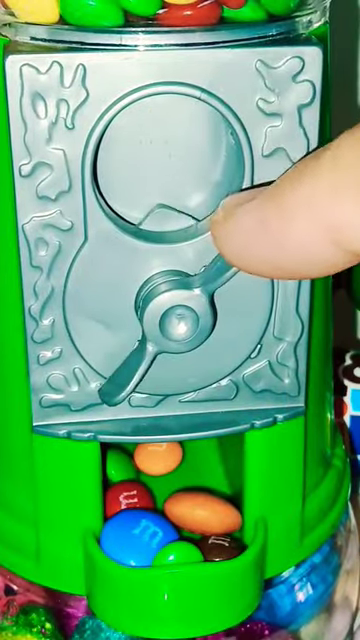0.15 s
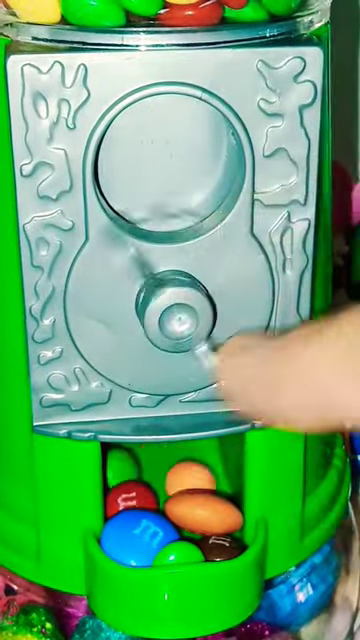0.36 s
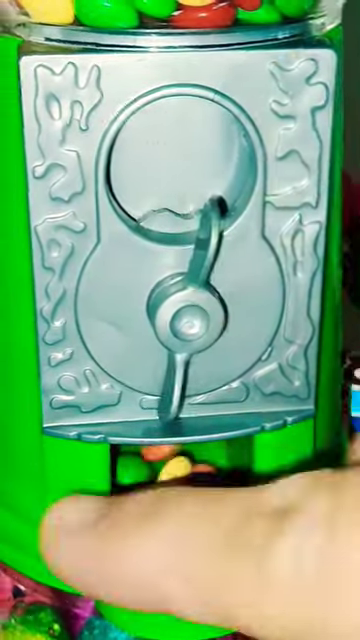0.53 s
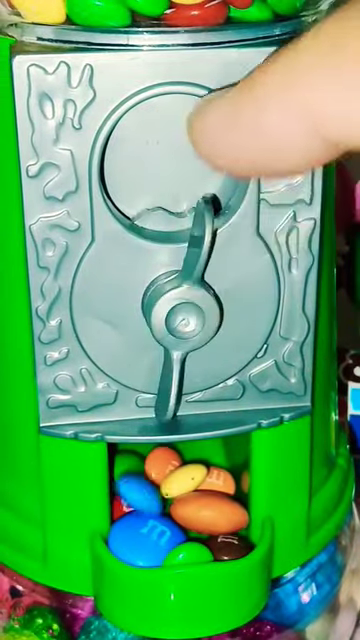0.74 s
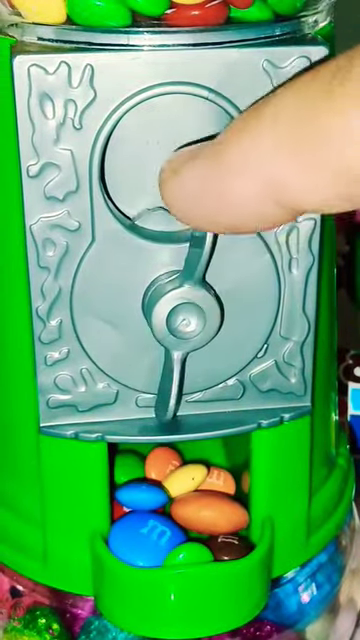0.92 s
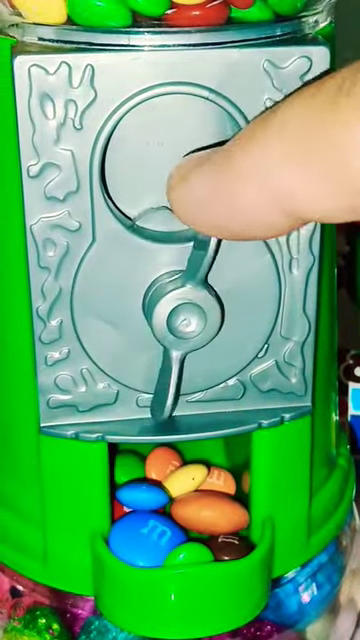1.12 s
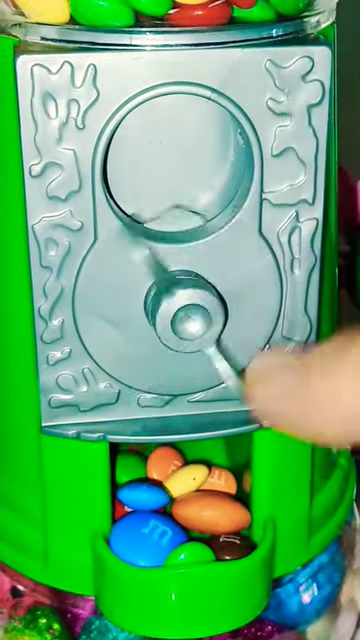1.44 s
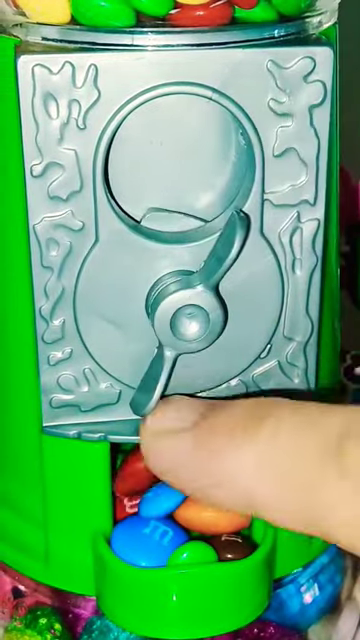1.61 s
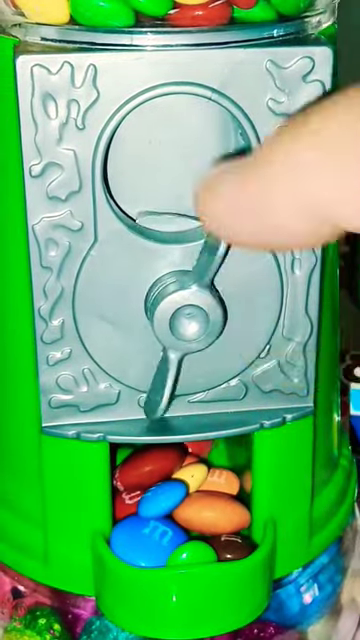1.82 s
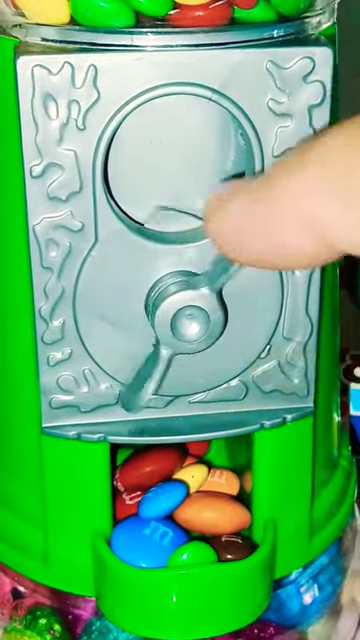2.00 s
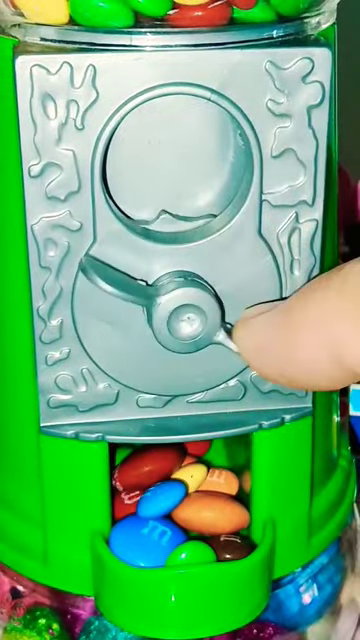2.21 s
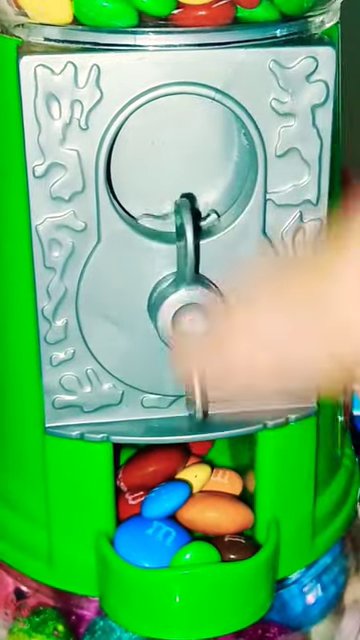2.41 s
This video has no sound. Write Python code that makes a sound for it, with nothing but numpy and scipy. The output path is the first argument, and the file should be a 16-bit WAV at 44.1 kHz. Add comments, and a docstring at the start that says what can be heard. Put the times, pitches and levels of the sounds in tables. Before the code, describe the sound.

A plastic candy dispenser's crank clicks and rubs close by from about 0.2 seconds. Hard candies bounce into the tray from 0.4 to 0.8 seconds, and the loudest knocks give low thumps. After a short lull, the axle squeaks at around 1.3 seconds and more candies drop at 1.5. The crank keeps knocking and clicking crisply until about 2.3 seconds, over a faint low hum.

```python
"""Candy dispenser, close up

A small room, the stereo microphone close to a plastic candy dispenser whose crank a finger turns.
The crank knocks and rubs, its axle squeaks and its pawl clicks; hard candies bounce down the chute
into the tray, and the plastic rings. A few loud knocks overload the microphone with a low thump;
a faint hum lies beneath."""
import sys
import numpy as np
from scipy import signal
from scipy.fft import rfft, irfft
from scipy.io import wavfile
from scipy.ndimage import uniform_filter1d, minimum_filter1d

SR = 44100
rng = np.random.default_rng(int(sys.argv[2]) if len(sys.argv) > 2 else 0)


def digitize_waveform(pressure):
    """Quantize a signal to 16-bit integers and store it at the path in sys.argv[1].

    Rows of a 2-D input are taken as channels; values are limited to [-1, 1].
    """
    field = np.atleast_2d(pressure).T
    bounded = np.clip(field, -1, 1)
    quanta = np.round(bounded * 32767).astype(np.int16)
    wavfile.write(sys.argv[1], SR, quanta)


N = 112454
TIME = np.arange(N) / SR
CONTACT_LAG_S = .0005
SHELL_LIKENESS = .76  # how alike left and right hear the hollow shell, 0 to 1
# resonances of the plastic housing: (frequency [Hz], relative level [dB])
HOUSING_MODES = [(4060, -11), (4320, 1.5), (4685, -3)]


def from_db(db):
    """Decibels to gain."""
    return 10 ** (np.asarray(db) / 20)


def unit_rms(x):
    """Scale to an rms of 1."""
    return x / np.sqrt(np.mean(x ** 2) + 1e-20)


def pan(db):
    """Channel gains for a left-minus-right level difference."""
    return unit_rms(from_db(np.array([[db], [-db]]) / 2))


def decay(t, t60):
    """Exponential fall of 60 dB in t60 seconds, starting at t = 0."""
    return np.exp(-np.log(1000) * np.maximum(t, 0) / t60)


def on_bins(points, size):
    """Spread (frequency [Hz], level [dB]) points over the bins of a transform."""
    hz, db = np.transpose(points)
    return np.interp(np.log(np.fft.rfftfreq(size, 1 / SR) + 1), np.log(hz), db)


def noise(colour, size):
    """Two unrelated channels of coloured noise, rms 1."""
    white = rng.standard_normal((2, size))
    return unit_rms(irfft(rfft(white) * from_db(on_bins(colour, size)), size))


def drift(rate_hz):
    """Smooth random wander, rms 1."""
    r = np.exp(-2 * np.pi * rate_hz / SR)
    return unit_rms(signal.lfilter([1], [1, -2 * r, r * r], rng.standard_normal(2 * N))[N:])


def high_pass(x, hz, order):
    """Take away the lows."""
    return signal.sosfilt(signal.butter(order, hz, "high", fs=SR, output="sos"), x + 1e-18)


def add(out, start_s, sound):
    """Mix a stereo sound in at a time."""
    i = int(np.clip(start_s * SR, 0, N - 1))
    out[:, i:i + sound.shape[1]] += sound[:, :N - i]


def room_air():
    """Quiet room tone, mostly low rumble, wide around the microphone."""
    # spectrum of the air: (frequency [Hz], relative level [dB])
    colour = [(25, 0.5), (420, -6.5), (800, -15), (2700, -27), (8000, -28.5), (15000, -39)]
    mid, side = noise(colour, N)
    return from_db(-54) * (mid + from_db(-6) * side * [[1], [-1]])


def hum(hz=93, wander_hz=2.5, waver_db=1.5):
    """A faint low hum that wavers and swells towards the end."""
    # swell of the hum: (time [s], level [dB])
    swell = [(1.2, -60), (2.3, -53)]
    phase = 2 * np.pi * np.cumsum(hz + wander_hz * drift(5)) / SR
    level = from_db(np.interp(TIME, *np.transpose(swell)) + waver_db * drift(6))
    return level * np.sqrt(2) * np.sin(phase + np.array([[.6], [0]]))


def room_reflections(x, t60_s=.26, treble_t60_s=.16, build_s=.00067):
    """The near walls return a short diffuse tail that dies sooner in the top treble."""
    # spectrum of the reflections: (frequency [Hz], relative level [dB])
    colour = [(500, -2.5), (3000, 7.5), (15000, -5)]
    t = TIME[:SR // 2]
    wash = noise(colour, len(t))
    low = signal.sosfiltfilt(signal.butter(2, 14000, fs=SR, output="sos"), wash)
    tail = low * decay(t, t60_s) + (wash - low) * decay(t, treble_t60_s)
    tail *= 1 - np.exp(-t / build_s)
    response = unit_rms(tail) / np.sqrt(len(t))
    return from_db(-9) * signal.fftconvolve(x, response, axes=-1)[:, :N]


def overload_thumps(rise_s=.0002):
    """Low thumps: a few loud knocks overload the microphone, and its signal swings back slowly."""
    # overload thumps: (time [s], level [dB], left minus right [dB])
    thumps = [(0.277, -30.5, 16), (0.383, -15, 5.5), (0.586, -13, -6.5), (2.09, -20.5, -8.5)]
    offset = np.exp(-TIME / rise_s) - 1
    for _ in range(3):
        offset = high_pass(offset, hz=8.3, order=1)
    out = np.zeros((2, N))
    for s, db, pan_db in thumps:
        add(out, s, from_db(db) * pan(pan_db) * offset)
    return out


def uneven(colour, spread_db=5):
    """Every contact favours other resonances: random peaks and dips in its spectrum."""
    hz = np.geomspace(300, 16000, 56)
    colour_hz, colour_db = np.transpose(colour)
    smooth_db = np.interp(np.log(hz), np.log(colour_hz), colour_db)
    return np.transpose([hz, smooth_db + spread_db * rng.standard_normal(len(hz))])


def plastic_burst(colour, t60_s, likeness=.5, attack_s=.00062, hold_s=.00097, right_lag_s=.0002236):
    """Dense, quickly dying modes of struck plastic, a little to the left of the microphone."""
    t = TIME[:2048]
    envelope = np.minimum(t / attack_s, 1) * decay(t - hold_s, t60_s)
    left, unrelated = noise(uneven(colour), len(t))
    delayed = np.interp(t - right_lag_s, t, left)
    right = likeness * delayed + np.sqrt(1 - likeness ** 2) * unrelated
    burst = np.array([left, right]) * envelope
    # each channel carries the energy of the envelope
    return burst * np.sqrt(np.sum(envelope ** 2) / np.sum(burst ** 2, axis=1, keepdims=True))


def ringing(x, modes, width_hz=38.5):
    """The plastic rings on at its own narrow resonances."""
    r = np.exp(-np.pi * width_hz / SR)
    zeros = np.array([1, 0, -1]) * (1 - r * r) / 2
    out = np.zeros((2, N))
    for hz, db in modes:
        poles = [1, -2 * r * np.cos(2 * np.pi * hz / SR), r * r]
        out += from_db(db + 4.5) * signal.lfilter(zeros, poles, x + 1e-18)
    return out


def click(db, clack_db, pan_db):
    """A hard contact on plastic: a bright snap and a lower clack."""
    # spectra of the snap and the clack: (frequency [Hz], relative level [dB])
    snap_colour = [(3000, -47), (4200, -13), (7200, 0.5), (9400, -2), (11200, -14), (16000, -30.5)]
    clack_colour = [(1800, -11.5), (2700, -3.5), (4300, 3), (8000, -29.5)]
    snap = from_db(-4.5) * plastic_burst(snap_colour, t60_s=.021)
    clack = from_db(clack_db) * plastic_burst(clack_colour, t60_s=.028)
    return from_db(db) * pan(pan_db) * (snap + clack)


def knocks(hits, clack_db):
    """Each knock is a click plus a hollow note of the shell."""
    # spectrum of the hollow shell: (frequency [Hz], relative level [dB])
    shell_colour = [(750, -3.5), (1400, 7), (2600, -3), (4000, -14.5)]
    out = np.zeros((2, N))
    for s, click_db, shell_db, pan_db in hits:
        shell = from_db(shell_db + 6.5) * plastic_burst(shell_colour, t60_s=.015, likeness=SHELL_LIKENESS)
        add(out, s + CONTACT_LAG_S, click(click_db, clack_db, pan_db) + shell)
    return out


def wheel_rub(grains_per_s=800, spread_db=5, grain_t60_s=.012):
    """Tiny random contacts while the wheel moves among the candies."""
    # turns of the crank: (start [s], end [s], level [dB])
    turns = [(.155,0.178,-48), (0.203,0.348,-33.5), (.34,0.531,-36), (1.296,1.327,-21.5),
             (1.377,1.538,-34.5), (1.625,1.721,-32), (1.782,1.809,-38), (1.985,2.084,-38),
             (2.138,2.276,-42.5)]
    # spectrum of the rubbing: (frequency [Hz], relative level [dB])
    colour = [(780, -2.5), (2800, -5), (7000, 4.5), (16000, -18.5)]
    effort = np.zeros(N)
    for start, end, db in turns:
        effort += from_db(db) * np.clip(np.minimum(TIME - start, end - TIME) / .0082, 0, 1)
    sizes = from_db(spread_db * np.minimum(rng.exponential(1, N), 4))
    grains = sizes * (rng.random(N) < grains_per_s / SR)
    power = signal.lfilter([1], [1, -decay(2 / SR, grain_t60_s)], grains ** 2 + 1e-18)
    return effort * unit_rms(np.sqrt(power) * noise(colour, N))


def wheel_bumps(shell_hz=820):
    """The wheel bumps softly in its shell: dull, woody knocks around the shell's lowest note."""
    # soft contacts: (time [s], level [dB])
    bumps = [(0.175,-37), (.234,-27), (.319,-33), (.347,-24), (.368,-24), (1.322,-22), (1.356,-26.5),
             (1.636,-28.5), (1.9,-34), (1.955,-41.5)]
    colour = [(shell_hz, 0), (2 * shell_hz, -10), (10 * shell_hz, -40)]
    out = np.zeros((2, N))
    for s, db in bumps:
        add(out, s, from_db(db) * plastic_burst(colour, t60_s=.035, likeness=SHELL_LIKENESS))
    return out


def axle_squeaks(top_hz=9000):
    """The axle sticks and slips: short tones with overtones, rougher towards their end."""
    # one glide per squeak: (time [s], pitch [Hz], level of the second harmonic [dB])
    glides = [
        [(1.125,2510,-67.5), (1.155,2410,-53.5), (1.22,2540,-95)],
        [(1.292,2640,-35.5), (1.300,2516,-24), (1.311,2110,-24), (1.326,1937,-28)],
        [(1.382,4380,-31), (1.389,4150,-20), (1.396,4450,-26.5)],
    ]
    # tone of each squeak: (loss per harmonic [dB], final roughness [share of pitch], left minus right [dB])
    tones = [(12.5, 0.0019, -1), (-2, 0.11, 0), (-4.5, 0.0067, -1.5)]
    out = np.zeros((2, N))
    for glide, (loss_db, roughness, pan_db) in zip(glides, tones):
        s, hz, db = np.transpose(glide)
        progress = np.clip((TIME - s[0]) / (s[-1] - s[0]), 0, 1)
        pitch = np.interp(TIME, s, hz) * (1 + roughness * progress ** 2 * drift(rate_hz=900))
        level = from_db(np.interp(TIME, s, db)) * (TIME > s[0]) * (TIME < s[-1])
        phase = 2 * np.pi * np.cumsum(pitch) / SR
        for k in range(1, 5):
            gain = from_db(-loss_db * (k - 2)) / np.sqrt(1 + (k * pitch / top_hz) ** 10)
            harmonic = np.sin(k * phase + rng.uniform(0, np.pi, (2, 1)))
            out += pan(pan_db) * level * gain * harmonic
    return out


def pawl_clicks():
    """The pawl snaps over a tooth: thin, crisp clicks that set the housing ringing."""
    # snaps of the pawl: (time [s], level [dB], left minus right [dB])
    snaps = [(1.852,-13.5,7.5), (2.001,-15,10)]
    clicks = np.zeros((2, N))
    for s, db, pan_db in snaps:
        add(clicks, s + CONTACT_LAG_S, click(db, clack_db=-12.5, pan_db=pan_db))
    return high_pass(clicks, hz=2884, order=4) + from_db(-6.5) * ringing(clicks, HOUSING_MODES)


def turning_crank():
    """The crank and its wheel knock, bump and rub inside the shell."""
    # knocks of the crank: (time [s], click level [dB], shell level [dB], left minus right [dB])
    hits = [(.253,-15,-33.5,-8), (.264,-3,-38,5), (.269,-6.5,-31.5,-11), (.274,-9,-36,-1),
            (.344,-9.5,-33.5,5.5), (.380,1.5,-47,8), (.396,-9,-39,-7.5), (1.405,-0.5,-15,-1),
            (1.437,-12.5,-34,-2), (1.444,-8.5,-30,4), (1.647,-10.5,-42,4.5), (1.666,-20.5,-36.5,-6),
            (1.686,-18,-62,8.5), (1.694,-21,-26,5), (2.040,-7,-18.5,3.5), (2.089,-2,-20.5,2.5),
            (2.215,-29,-34,4.5), (2.262,-22,-29,8)]
    return knocks(hits, clack_db=-16.5) + wheel_bumps() + wheel_rub()


def falling_candies():
    """Hard candies bounce down the chute and in the tray."""
    # bounces: (time [s], click level [dB], shell level [dB], left minus right [dB])
    hits = [(.444,-12,-28,0), (.456,-3.5,-55,3), (.473,-8.5,-61,0), (.496,-14,-45,-1), (.517,-11.5,-37.5,1),
            (.538,-12.5,-36,-2.5), (.555,-19.5,-37,5), (.586,0,-33.5,4.5), (.631,-16,-34,10),
            (.653,-9,-28.5,5.5), (.723,-11.5,-37.5,6), (.799,-31,-53,21), (.818,-28,-47.5,16),
            (1.483,-7.5,-34.5,-0.5), (1.492,-0.5,-31.5,-5), (1.502,-13,-28,20), (1.529,-10.5,-44,17)]
    return knocks(hits, clack_db=-17.5)


def dispenser(lowest_hz=713):
    """The whole dispenser at close range: its small body gives little bass; housing and tray ring."""
    # resonances of the tray: (frequency [Hz], relative level [dB])
    tray_modes = [(7090, -2.5), (7900, -0.5)]
    # stereo balance at the microphone: (frequency [Hz], left minus right [dB])
    balance = [(1200, -1.5), (3300, -2), (5500, 8.5), (10000, -6)]
    crank = high_pass(turning_crank(), lowest_hz, order=8)
    candies = high_pass(falling_candies(), lowest_hz, order=8)
    rings = ringing(crank, HOUSING_MODES) + ringing(crank + candies, tray_modes)
    direct = crank + candies + rings + pawl_clicks() + axle_squeaks()
    channel_gains = from_db(on_bins(balance, N) * np.array([[1], [-1]]) / 2)
    return irfft(rfft(direct) * channel_gains, N)


def limiter(x, ceiling_db=-1.5, release_db_per_s=448):
    """The gain drops at once on a hard knock and comes back over some tens of milliseconds."""
    peak_db = 20 * np.log10(np.abs(x).max(axis=0) + 1e-9)
    over_db = np.maximum(peak_db - ceiling_db, 0)
    release = release_db_per_s * TIME
    gain = from_db(release - np.maximum.accumulate(over_db + release))
    return x * uniform_filter1d(minimum_filter1d(gain, size=21), size=21)


def scene():
    """The dispenser close to the microphone, the small room behind it."""
    direct = dispenser()
    return direct + room_reflections(direct) + overload_thumps() + room_air() + hum()


def record(dry):
    """After the microphone, peaks are held down and the top is cut at 15.5 kHz."""
    low_pass = signal.ellip(10, .1, 80, 15500, fs=SR, output="sos")
    return signal.sosfilt(low_pass, limiter(dry))


dry = scene()
out = record(dry)
digitize_waveform(out)
```